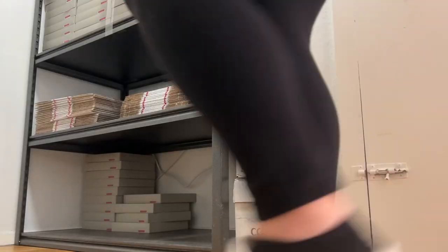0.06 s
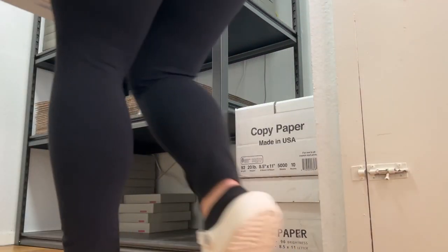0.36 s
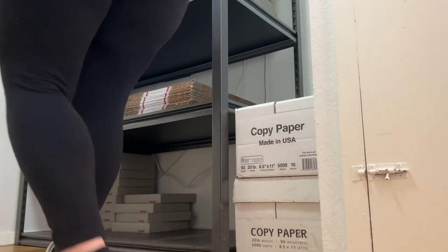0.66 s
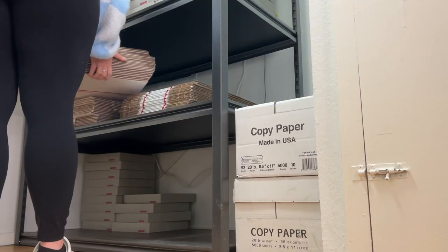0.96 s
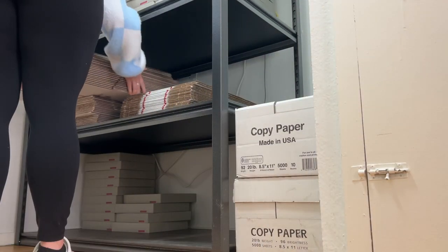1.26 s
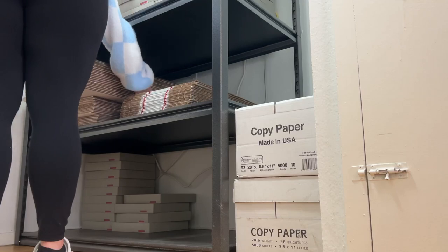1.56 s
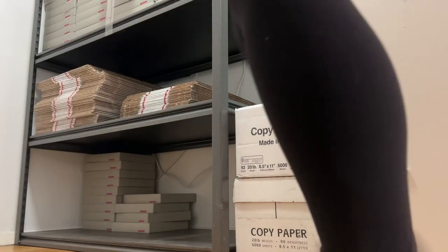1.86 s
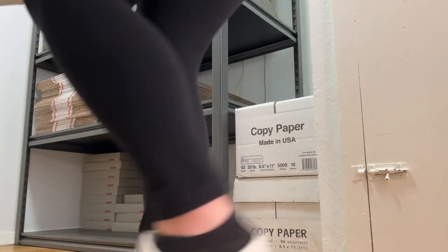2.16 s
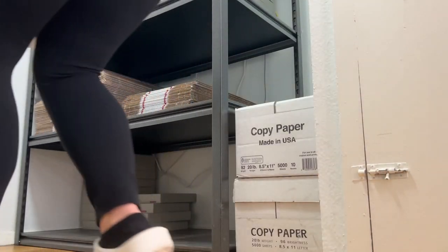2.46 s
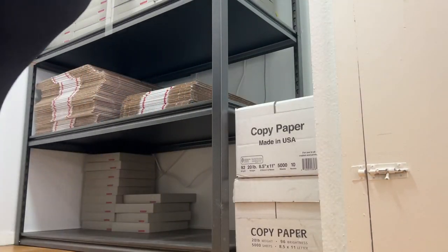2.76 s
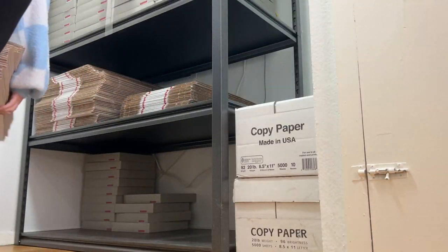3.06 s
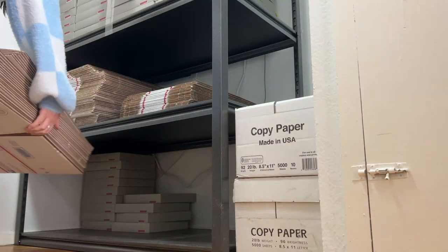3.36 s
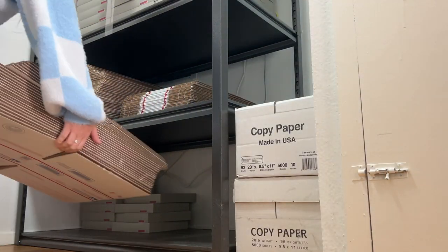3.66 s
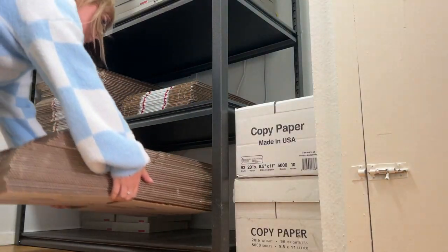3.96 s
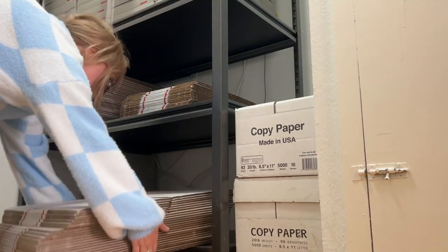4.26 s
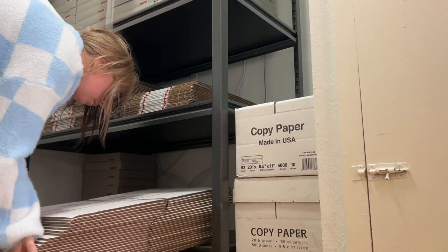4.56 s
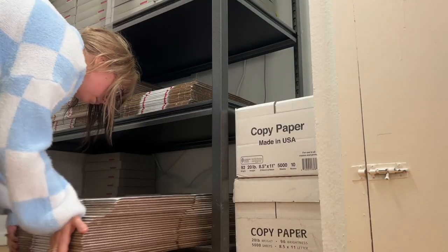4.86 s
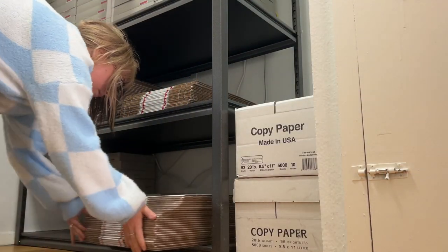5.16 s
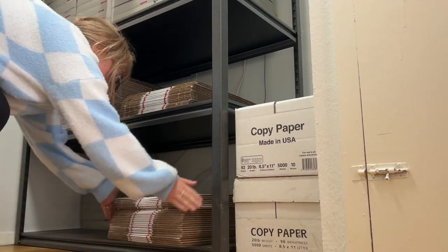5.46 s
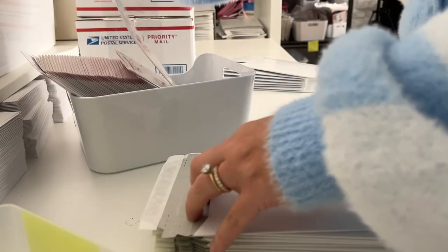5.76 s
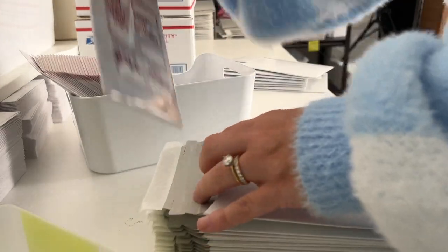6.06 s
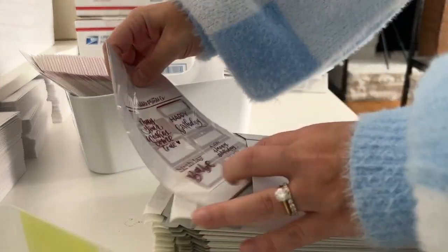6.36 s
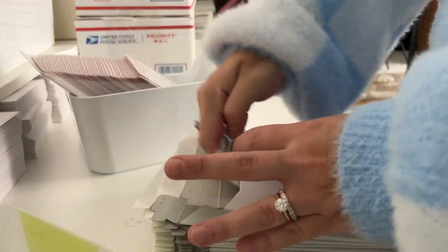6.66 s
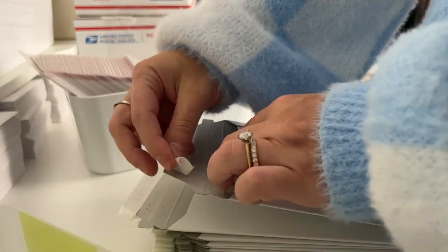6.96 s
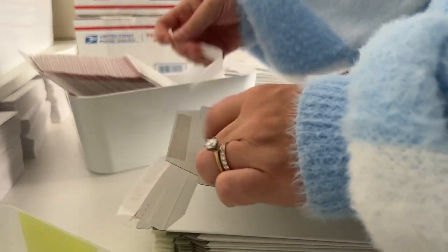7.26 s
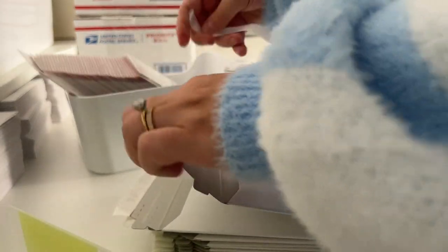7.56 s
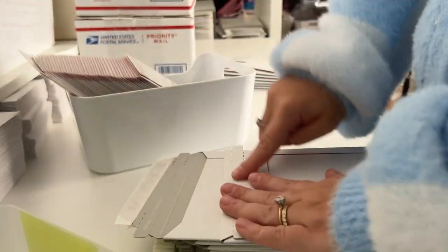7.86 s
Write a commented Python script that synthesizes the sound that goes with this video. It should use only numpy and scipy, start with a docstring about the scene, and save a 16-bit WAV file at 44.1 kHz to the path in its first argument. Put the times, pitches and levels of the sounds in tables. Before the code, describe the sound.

Flat cardboard boxes knock down and scrape along a metal shelf, followed by crisp paper crackling and finger taps on a card mailer.

```python
"""Bundles of flat cardboard boxes are shelved in a small storeroom: card scuffs, clothes swish, soft shoes
step on boards. One bundle knocks down on the steel shelf, slides in with a judder and thuds at the back.
Then, close up at a desk, a paper slip is tucked into a card mailer, its strip peeled off and the flap
pressed down: fibres rub, creases snap, fingers ring the hollow card. A low rumble fills both rooms."""
import sys
import numpy as np
from scipy import signal
from scipy.fft import rfft, irfft
from scipy.io import wavfile
from scipy.ndimage import uniform_filter1d

SR = 44100
rng = np.random.default_rng(int(sys.argv[2]) if len(sys.argv) > 2 else 0)


def log_audio(samples):
    """Write samples as a 16-bit WAV file to the path given in sys.argv[1]."""
    # one column per channel
    frames = np.atleast_2d(samples).T
    # limit to full scale, then quantise
    limited = np.clip(frames, -1, 1)
    pcm = np.round(limited * 32767).astype(np.int16)
    wavfile.write(sys.argv[1], SR, pcm)


N = 349272
TIME_S = np.arange(N) / SR
COARSE_TIME_S = np.arange(0, N, 32)[:, None] / SR
DESK_START_S = 5.55
FLAT = ((1, 0), (2, 0))  # 0 dB at all frequencies

# Table levels are relative: each source adds its own gain.
# Noise spectra. Each row: frequency in Hz, density in dB.
STORE_RUMBLE = [(20, -47), (45, -65), (65, -4), (88, 0.5), (115, -2.5), (160, -15.5), (270, -16),
                (450, -32.5), (1000, -70)]
DESK_RUMBLE = [(20, -23), (45, -2), (65, -1), (105, -6.5), (165, 3), (185, -14), (215, -21), (420, -21),
               (1000, -103)]
STORE_AIR = [(20, -35), (50, 21), (110, -22), (300, 0.5), (520, 4.5), (660, 4), (800, -8.5), (1300, -2.5),
             (3000, -11), (7000, -10.5), (11000, -68), (16000, -49)]
DESK_AIR = [(100, 9), (400, -3), (1000, 3), (1700, -13), (5000, -8), (10000, -23), (16000, -16)]
CLOTH_SWISH = [(500, -59), (1500, -1), (3000, 0), (5800, 4.5), (8500, 3.5), (10000, -2.5), (12000, 3),
               (16000, -5.5)]
CARD_SCUFF = [(130, 4.5), (260, 0.5), (450, 1.5), (750, -2), (1000, 1), (1600, -4), (2600, -5.5),
              (5000, -13.5), (12000, -24)]
EDGE_KNOCK = [(180, -16), (420, 3), (700, -6), (1200, 1.5), (1700, -9), (9000, -17), (16000, -27)]
CARD_CRACK = [(300, -42), (1200, 12), (3000, 6), (6000, 3.5), (9000, 1), (16000, -12)]
CARD_SLIDE = [(120, -13), (300, 1), (600, 0), (1100, 1), (1400, 2.5), (2100, 0.5), (4300, -0.5), (6700, 0),
              (8700, 0.5), (10000, -4), (12000, -2), (16000, -11)]
PAPER_HISS = [(700, -22), (2000, 5.5), (4000, 0.5), (6500, 1.5), (8300, 4.5), (10000, 0.5), (12500, 5),
              (16000, -2.5)]
PAPER_RUB = [(120, 3), (250, 3), (650, 3), (1250, -1), (2200, -1), (3300, -9.5), (4800, -2.5),
             (12000, -33.5)]
CREASE_SNAP = [(600, -2), (2500, -12), (5000, -4), (8000, 5.5), (10000, 6), (12500, 8), (16000, -0.5)]

# Modes of struck bodies. Each row: frequency in Hz, level in dB, T60 in seconds.
FLOOR_MODES = [(188, -1, 0.055), (277, -7, 0.035), (461, 3, 0.063), (555, -2.5, 0.079), (714, 2, 0.028),
               (1160, -9, 0.051)]
EDGE_MODES = [(450, 6.5, 0.04), (592, -11, 0.15), (932, -11, 0.13), (1133, -15, 0.24), (1215, 3, 0.03),
              (1300, -13, 0.2), (1475, -8, 0.07)]
BUNDLE_MODES = [(389, 3.5, 0.061), (505, -7.5, 0.18), (590, -5.5, 0.063), (679, 3, 0.054), (997, -3, 0.13),
                (1340, -14, .06)]
SHELF_MODES = [(84.8, 5.5, 0.14), (104.5, -1.5, 0.13), (139.8, -4.5, 0.22), (155, -1.5, 0.13),
               (182, -10.5, 0.16), (291, -14, 0.044)]
MAILER_MODES = [(247, 5.5, 0.056), (425, 11, 0.028), (682, -3.5, 0.028), (800, 6.5, 0.033),
                (948, 4.5, 0.043), (1027, 10, 0.029), (1400, 6, 0.016), (1830, 4, 0.041), (2380, 4, 0.03),
                (2890, 15.5, 0.014)]
DESK_MODES = [(89.5, 3.5, 0.11), (121, 0, 0.05), (170, 6.5, 0.053), (242, 2, 0.072)]
# Narrow resonances of the shelf's steel. Each row: centre in Hz, width in Hz, level in dB.
STEEL_PEAKS = [(1430, 90, -5), (2375, 20, -7), (5510, 20, -5), (6728, 35, -2), (6902, 20, -6),
               (8055, 40, -3), (8583, 18, -6), (8695, 25, -4), (8788, 30, -3), (12080, 35, -3)]

# Level of the low room rumble over time. Each row: time in seconds, level in dB.
LOW_RUMBLE_LEVELS = [(0.0, -47.5), (3.24, -57), (5.29, -55.5), (5.62, -51.5), (7.92, -48.5)]
# A leg, sleeve or carried card brushing past. Each row: peak time and length in seconds,
# swish and scuff in dB.
BRUSHES = [(0.04, 0.21, -62, -53), (0.27, 0.34, -62, -54), (0.347, 0.05, -55, -52), (0.555, 0.13, -59, -60),
           (0.706, 0.29, -67.5, -54), (1.034, 0.47, -57.5, -56.5), (1.28, 0.064, -56, -53),
           (1.359, 0.28, -51, -51.5), (1.672, 0.53, -56, -55), (1.976, 0.06, -55.5, -53.5),
           (2.155, 0.21, -52.5, -54), (2.366, 0.051, -68, -57), (2.467, 0.05, -58.5, -57.5),
           (2.571, 0.1, -51.5, -57), (2.667, 0.11, -51.5, -55), (2.758, 0.098, -59.5, -50.5),
           (2.895, 0.12, -55.5, -60), (3.426, 0.16, -56.5, -59), (3.682, 0.079, -60, -57),
           (3.878, 0.11, -54, -67), (4.028, 0.8, -68.5, -56), (4.295, 0.54, -59.5, -63)]
# Soft shoes landing. Each row: start in seconds, board tap, thud and sole slap in dB.
STEPS = [(0.554, -42, -47, -47), (1.938, -35, -47, -40.5), (2.32, -38, -49, -61), (2.627, -41, -48.5, -54),
         (3.824, -50, -45.5, -46), (3.85, -53, -50, -34.5)]
# Soles turning. Each row: peak time in seconds, level in dB, centre in Hz.
SOLE_SCRAPES = [(0.309, -55.5, 1620), (2.039, -50, 1170), (2.359, -57, 1400), (3.821, -52, 2820),
                (4.07, -54.5, 2090)]
# A bundle hitting a hard edge. Each row: start in seconds, knock and ring in dB, ring centre in Hz.
EDGE_HITS = [(3.0755, -39.5, -38, 420), (3.0845, -44.5, -39, 1250)]
# A bundle striking the shelf and rocking back. Each row: start in seconds, knock in dB, its centre in Hz,
# thud in dB, its spectral dip in Hz, stack note, clack and crack in dB, settling delay in seconds.
SHELF_HITS = [(4.152, -22, 296, -27.5, 190, -24, -36, -28.5, 0.0023),
              (4.179, -33.5, 330, -39, 190, -31, -52, -41, 0.0015),
              (4.286, -21, 633, -33.5, 200, -26.5, -43, -34.5, 0.0067),
              (5.323, -26, 230, -13, 103, -33, -42.5, -55, 0.0017),
              (5.371, -35, 260, -34, 170, -32, -51, -39.5, 0.0012)]
# The push along the shelf. Each row: time in seconds, hiss and judder in dB, judder in Hz, rumble in dB.
SHELF_PUSH = [(4.59, -59.5, -77, 200, -68), (4.651, -44, -66, 203.4, -62), (4.82, -34, -60, 204, -45),
              (4.97, -34.5, -54, 202.2, -38.5), (5.07, -34, -40.5, 227.3, -43.5),
              (5.17, -35.5, -47.5, 200, -46), (5.25, -37.5, -55, 200, -55),
              (5.371, -40.5, -40.5, 198.4, -30), (5.53, -74, -75, 205, -75)]
# Slip sliding, strip peeling, flap being smoothed. Each row: peak time, build-up and release in seconds,
# hiss and rub in dB.
PAPER_PULLS = [(5.62, 0.55, 0.14, -64, -63), (5.845, 0.29, 0.15, -60, -63),
               (6.137, 0.013, 0.078, -39.5, -33.5), (6.385, 0.22, 0.097, -50.5, -43),
               (6.56, 0.015, 0.24, -66, -53.5), (6.701, 0.23, 0.056, -46, -42),
               (6.892, 0.095, 0.068, -47.5, -42.5), (7.05, 0.008, 0.28, -51.5, -41.5),
               (7.249, 0.17, 0.025, -45, -43.5), (7.327, 0.17, 0.06, -47.5, -79),
               (7.522, 0.022, 0.06, -43.5, -42), (7.6, 0.25, 0.24, -51.5, -59),
               (7.745, 0.029, 0.29, -55.5, -53)]
# Creases buckling. Each row: start in seconds, snap and flap in dB, flap centre in Hz.
CREASES = [(5.552, -44, -53, 3000), (5.6122, -32.5, -49, 3280), (5.664, -27.5, -57, 2560),
           (5.83, -29, -50, 4640), (5.8558, -26.5, -52, 4360), (5.908, -37, -54, 1580),
           (6.1244, -23, -35.5, 2840), (6.1425, -32, -36.5, 3200), (6.2912, -20.5, -43, 1860),
           (6.331, -19.5, -35, 3400), (6.343, -26, -36, 2220), (6.3566, -33, -33, 2330),
           (6.377, -30, -29, 1490), (6.3962, -17, -46, 1200), (6.408, -20, -35.5, 4590),
           (6.422, -20.5, -38, 2600), (6.4527, -28.5, -47.5, 1210), (6.5215, -31.5, -47, 1920),
           (6.5496, -20, -33.5, 1530), (6.5574, -21, -49, 4600), (6.5762, -25, -38.5, 1870),
           (6.5947, -20, -34, 2750), (6.6096, -25.5, -49, 3000), (6.63, -25, -42, 1200),
           (6.652, -21, -39, 1250), (6.66, -19.5, -34, 1360), (6.696, -28, -35, 3500),
           (6.921, -24.5, -51, 2290), (6.955, -41, -53, 1400), (6.9993, -46, -42.5, 1790),
           (7.0555, -16, -39, 1750), (7.198, -26, -44, 1390), (7.248, -30, -36.5, 4950),
           (7.2558, -15, -35.5, 5030), (7.5186, -43, -31.5, 4240), (7.596, -41, -31.5, 3480),
           (7.7238, -29.5, -44, 2660)]
# Fingers on the pile of mailers. Each row: start in seconds, tap in dB, its centre in Hz, push in dB.
FINGER_TAPS = [(6.1251, -21.5, 650, -42), (6.148, -28.5, 1410, -38), (6.377, -30, 554, -34),
               (6.666, -35.5, 970, -50), (6.697, -35, 1110, -60), (6.888, -37, 1280, -44.5),
               (6.907, -35, 790, -40), (6.999, -35, 453, -50), (7.05, -35, 450, -62),
               (7.441, -38, 1710, -47.5), (7.473, -38.5, 253, -41.5), (7.518, -35.5, 1100, -46),
               (7.536, -41, 1300, -39.5), (7.581, -29.5, 1290, -50), (7.597, -30, 1590, -56),
               (7.737, -40.5, 1000, -52), (7.805, -36.5, 304, -64), (7.876, -41.5, 1120, -46)]
# A fingertip dragged on the mailer. Each row: start and length in seconds, level in dB, centre in Hz.
FINGER_DRAGS = [(6.655, 0.075, -40, 1050), (6.848, 0.095, -37.5, 1150)]

# Room decay. Each row: frequency in Hz, T60 in seconds.
STORE_T60 = [(80, 0.46), (200, 0.3), (530, 0.28), (1400, 0.39), (4000, 0.48), (14000, 0.18)]
DESK_T60 = [(100, 0.58), (500, 0.042), (2000, 0.4), (6000, 0.25), (14000, 0.088)]
# Likeness of the channels. Each row: frequency in Hz, correlation from 0 to 1.
STEREO_CORRELATION = [(60, 0.97), (130, 1), (290, 0.58), (640, 0.049), (1400, 0.17), (3000, 0.2),
                      (7000, 0.029)]
# Microphone imbalance. Each row: frequency in Hz, left minus right in dB.
LEFT_LIFT = [(100, 1), (400, 0), (1000, 1.5), (2800, 2), (4400, 6), (6800, 8), (8200, -1.5), (9000, 0)]


def amp(db):
    """Decibels to gain."""
    return np.exp(np.asarray(db) * (np.log(10) / 20))


def unit_rms(x):
    """Scale to an rms of one."""
    return x / np.sqrt(np.mean(x ** 2) + 1e-20)


def unit_peak(x, size=220):
    """Scale the loudest window of size samples to an rms of one."""
    return x / np.sqrt(uniform_filter1d(np.mean(np.atleast_2d(x) ** 2, 0), size).max() + 1e-20)


def log_interp(points, hz):
    """Interpolate (Hz, value) points in log frequency."""
    point_hz, value = np.transpose(points)
    return np.interp(np.log(hz + 1), np.log(point_hz + 1), value)


def gain_curve(times_s, db):
    """Gain through timed levels, fading 400 dB/s beyond the ends."""
    outside_s = np.maximum(times_s[0] - TIME_S, 0) + np.maximum(TIME_S - times_s[-1], 0)
    return amp(np.interp(TIME_S, times_s, db) - 400 * outside_s)


def stroke_gain(shapes, db):
    """Gain of overlapping strokes, summed in power."""
    return np.interp(TIME_S, COARSE_TIME_S[:, 0], np.sqrt(shapes ** 2 @ amp(db) ** 2))


def add(mix, start_s, sound):
    """Mix a sound in at start_s."""
    part = mix[:, max(round(start_s * SR), 0):][:, :sound.shape[-1]]
    part += sound[..., :part.shape[1]]


def colour(x, spectrum):
    """Give two independent signals a spectrum and stereo correlation."""
    hz = np.fft.rfftfreq(x.shape[1], 1 / SR)
    left, other = rfft(x)
    correlation = np.clip(log_interp(STEREO_CORRELATION, hz), 0, 1)
    pair = np.array([left, correlation * left + np.sqrt(1 - correlation ** 2) * other])
    return unit_rms(irfft(pair * amp(log_interp(spectrum, hz)), x.shape[1]))


def noise(spectrum, size=N):
    """Shaped stereo noise, rms one."""
    return colour(rng.standard_normal((2, size)), spectrum)


def wander(rate_hz, size=N):
    """Random drift below rate_hz, rms one."""
    hz = np.fft.rfftfreq(size, 1 / SR)
    return unit_rms(irfft(rfft(rng.standard_normal(size)) / (1 + (hz / rate_hz) ** 4), size))


def friction(spectrum, catches_per_s, spread_db, grain_share, drift_db):
    """Fibres catch and let go: grains over a hiss whose colour drifts as the contact moves."""
    strength = amp(spread_db * np.minimum(rng.exponential(1, N), 4.5))
    catches = strength * (rng.random(N) < catches_per_s / SR)
    power = signal.lfilter([1], [1, -np.exp(-1 / 16)], catches ** 2)
    grip = np.sqrt(1 - grain_share + grain_share * power / power.mean())
    frames = signal.stft(grip * rng.standard_normal((2, N)), nperseg=512)[2]
    patches = uniform_filter1d(rng.standard_normal(frames.shape[1:]), size=4, axis=0)
    patches = unit_rms(uniform_filter1d(patches, size=9, axis=1))
    return colour(signal.istft(frames * amp(drift_db * patches), nperseg=512)[1][:, :N], spectrum)


def band(centre_hz, db_per_oct):
    """Spectral hump; a negative slope gives a dip."""
    return [(centre_hz * 2. ** k, -db_per_oct * (np.hypot(k, .5) - .5)) for k in np.arange(-4, 6)]


def burst(spectrum, rise_s, t60_s, ripple_db=0, size=8192):
    """Decaying noise; ripple adds chance resonances."""
    t, hz = np.arange(size) / SR, np.fft.rfftfreq(size, 1 / SR)
    knots_hz = np.geomspace(200, 18000, num=40)
    ripple = amp(ripple_db * np.interp(hz, knots_hz, rng.uniform(-4.4, 1, len(knots_hz))))
    envelope = (1 - np.exp(-t / rise_s)) * amp(-60 * t / t60_s)
    return irfft(rfft(noise(spectrum, size)) * ripple, size) * envelope


def ring(modes, rise_s, weights=FLAT, size=12000):
    """Decaying modes, weighted by the place and softness of the blow."""
    t = np.arange(size) / SR
    tones = [(-1) ** k * amp(db + log_interp(weights, hz) - 60 * t / t60_s) * np.sin(2 * np.pi * hz * t)
             for k, (hz, db, t60_s) in enumerate(modes)]
    return sum(tones) * (1 - np.exp(-(t / rise_s) ** 2))


def room(x, t60_curve, build_s):
    """Scattered reflections, each band decaying at its own rate."""
    hz, t, frames = signal.stft(noise(FLAT, size=20480), SR, nperseg=256)
    decay = amp(-60 * t / log_interp(t60_curve, hz)[:, None])
    tail = signal.istft(frames * decay, SR, nperseg=256)[1]
    tail *= 1 - np.exp(-(np.arange(tail.shape[1]) / SR / build_s) ** 2)
    return signal.oaconvolve(x, tail / np.linalg.norm(tail[0]), axes=1)[:, :N]


def tone(hz):
    """Sine following a frequency curve."""
    return np.sin(2 * np.pi * np.cumsum(hz) / SR)


def room_tone(hum_hz=338, hum_db=-68):
    """Low rumble and air in each place; a fan's wavering hum in the storeroom."""
    rumble = gain_curve(*np.transpose(LOW_RUMBLE_LEVELS))
    at_desk = np.clip((TIME_S - DESK_START_S) * 20 + .5, 0, 1)
    hum = amp(hum_db) * unit_rms(tone(hum_hz + 2.08 * wander(11.5)))
    store = amp(2) * rumble * noise(STORE_RUMBLE) + amp(-62) * noise(STORE_AIR) + hum
    desk = amp(-2) * rumble * noise(DESK_RUMBLE) + amp(-70) * noise(DESK_AIR)
    return store * np.sqrt(1 - at_desk) + desk * np.sqrt(at_desk)


def clothes_and_card(idle_swish_db=-84.5, idle_scuff_db=-62.6):
    """Friction follows each move's speed: cloth swishes finely, card scuffs lower and coarser."""
    peak_s, length_s, swish_db, scuff_db = np.transpose(BRUSHES)
    speed = np.exp(-(2 * (COARSE_TIME_S - peak_s) / length_s) ** 2)
    in_store = TIME_S < DESK_START_S
    swish = np.hypot(stroke_gain(speed, swish_db + 4.5), in_store * amp(idle_swish_db))
    scuff = np.hypot(stroke_gain(speed, scuff_db + 0.9), in_store * amp(idle_scuff_db))
    cloth = friction(CLOTH_SWISH, catches_per_s=2700, spread_db=4.5, grain_share=0.12, drift_db=2.5)
    card = friction(CARD_SCUFF, catches_per_s=300, spread_db=2, grain_share=0.29, drift_db=1.8)
    return swish * cloth + scuff * card


def footsteps():
    """A sole slaps, the boards ring hollow, the weight thuds after; a turning sole rasps."""
    out = np.zeros((2, N))
    for start_s, tap_db, thud_db, slap_db in STEPS:
        slap = unit_peak(burst(band(1200, db_per_oct=4.5), rise_s=0.00045, t60_s=0.049))
        thud = unit_peak(burst(band(170, db_per_oct=11), rise_s=0.012, t60_s=0.095))
        add(out, start_s, amp(slap_db - 4.5) * slap + amp(thud_db + 2.5) * thud)
        add(out, start_s, amp(tap_db - 6) * unit_peak(ring(FLOOR_MODES, rise_s=0.0014)))
    for peak_s, db, hz in SOLE_SCRAPES:
        add(out, peak_s - .07, amp(db) * noise(band(hz, db_per_oct=12), size=6144) * np.hanning(6144))
    return out + amp(-2) * room(out, STORE_T60, build_s=0.0024)


def card_squeak(start_s=0.727, start_hz=3300, glide_hz_per_s=9000):
    """Card rubs on card in one short rising squeak."""
    out, t = np.zeros((2, N)), np.arange(0, .06, 1 / SR)
    squeak = tone(start_hz + glide_hz_per_s * t + 170 * wander(400, size=len(t)))
    add(out, start_s, amp(-55.5) * squeak * np.hanning(len(t)))
    return out


def edge_knocks():
    """A lifted bundle knocks twice on a hard edge, which rings."""
    out = np.zeros((2, N))
    for start_s, knock_db, ring_db, hz in EDGE_HITS:
        knock = burst(EDGE_KNOCK, rise_s=0.0003, t60_s=0.19)
        edge = ring(EDGE_MODES, rise_s=0.00042, weights=band(hz, db_per_oct=10))
        add(out, start_s, amp(knock_db) * unit_peak(knock))
        add(out, start_s, amp(ring_db) * unit_peak(edge))
    return out


def shelf_impacts(stack_hz=207, stack_t60_s=0.086):
    """Edges crack, sheets clack, the hollow bundle knocks; its settling weight thuds in the shelf."""
    knocks, thuds = np.zeros((2, 2, N))
    stack = ring([(stack_hz, 0, stack_t60_s)], rise_s=0.0038)
    for start_s, knock_db, knock_hz, thud_db, dip_hz, stack_db, clack_db, crack_db, settle_s in SHELF_HITS:
        crack = burst(CARD_CRACK, rise_s=0.00033, t60_s=0.059)
        clack = burst(band(930, db_per_oct=13), rise_s=0.00027, t60_s=0.28)
        body = ring(BUNDLE_MODES, rise_s=0.00049, weights=band(knock_hz, db_per_oct=21))
        knock = burst(band(knock_hz, db_per_oct=23.5), rise_s=0.00069, t60_s=0.076)
        shelf = ring(SHELF_MODES, rise_s=0.0037, weights=band(dip_hz, db_per_oct=-11))
        add(knocks, start_s, amp(crack_db) * unit_peak(crack) + amp(clack_db + 0.5) * unit_peak(clack))
        add(knocks, start_s, amp(knock_db - 7.5) * unit_peak(body))
        add(knocks, start_s, amp(knock_db - 7.5) * unit_peak(knock))
        add(thuds, start_s + settle_s, amp(thud_db + 1.5) * unit_peak(shelf))
        add(thuds, start_s + settle_s, amp(stack_db) * unit_peak(stack))
    return knocks + thuds + room(amp(-6) * knocks + amp(-12) * thuds, STORE_T60, build_s=0.01)


def sliding_bundle():
    """Card groans while slow, then hisses and judders along the shelf; the steel sings and rumbles."""
    times_s, hiss_db, judder_db, judder_hz, rumble_db = np.transpose(SHELF_PUSH)
    scrape = friction(CARD_SLIDE, catches_per_s=7000, spread_db=3, grain_share=0.2, drift_db=1.3)
    hz = np.fft.rfftfreq(N, 1 / SR)
    steel_power = sum(amp(db) ** 2 / width_hz / (1 + (2 * (hz - centre_hz) / width_hz) ** 2)
                      for centre_hz, width_hz, db in STEEL_PEAKS)
    singing = unit_rms(irfft(rfft(noise(FLAT)) * np.sqrt(steel_power), N))
    hiss = gain_curve(times_s, hiss_db + 3.5) * unit_rms(scrape + amp(-6.5) * singing)
    shudder = tone(np.interp(TIME_S, times_s, judder_hz) + 5 * wander(20)) * amp(2.2 * wander(11))
    judder = gain_curve(times_s, judder_db + 4.5) * unit_rms(shudder)
    groan_gain = amp(-41.5) * np.exp(-((TIME_S - 4.72) / 0.13) ** 2)
    groan = groan_gain * noise(band(540, db_per_oct=17)) * unit_rms(amp(3 * wander(90)))
    rumble = gain_curve(times_s, rumble_db) * noise(band(115, db_per_oct=22.5))
    return hiss + judder + rumble + groan


def paper_rustle(swing_db=23.5):
    """Each pull builds and lets go: paper crackles and rubs, sounding the hollow mailer."""
    peak_s, build_s, release_s, hiss_db, rub_db = np.transpose(PAPER_PULLS)
    t = COARSE_TIME_S - peak_s
    effort = amp(-swing_db * np.minimum(np.maximum(-t / build_s, t / release_s), 10))
    crackle = friction(PAPER_HISS, catches_per_s=1400, spread_db=4.5, grain_share=0.3, drift_db=2.5)
    rasp = friction(PAPER_RUB, catches_per_s=1100, spread_db=3, grain_share=0.35, drift_db=1.5)
    return stroke_gain(effort, hiss_db + 5) * crackle + stroke_gain(effort, rub_db + 0.5) * on_mailer(rasp)


def on_mailer(rasp):
    """A rasp plus the mailer resonance it drives, at equal rms."""
    hollow = signal.oaconvolve(rasp, ring(MAILER_MODES, rise_s=0.0002)[None])[:, :rasp.shape[1]]
    return unit_rms(unit_rms(rasp) + unit_rms(hollow))


def crease_snaps():
    """Each buckling crease gives a flap, a sharp snap and a shiver."""
    out = np.zeros((2, N))
    shape = dict(ripple_db=4, size=2048)
    for start_s, snap_db, flap_db, flap_hz in CREASES:
        snap = unit_peak(burst(CREASE_SNAP, rise_s=0.0003, t60_s=0.0042, **shape), size=44)
        shiver = unit_peak(burst(CREASE_SNAP, rise_s=0.0016, t60_s=0.035, **shape))
        flap = unit_peak(burst(band(flap_hz, db_per_oct=14), rise_s=0.00033, t60_s=0.021, **shape))
        add(out, start_s, amp(flap_db - 0.5) * flap)
        add(out, start_s + 0.00076, amp(snap_db - 3) * (snap + amp(-16) * shiver))
    return out


def finger_taps():
    """Fingers ring the mailer, a nail brighter than a pad, and push the desk below."""
    out = np.zeros((2, N))
    for start_s, tap_db, hz, push_db in FINGER_TAPS:
        body = ring(MAILER_MODES, rise_s=0.00027, weights=band(hz, db_per_oct=12))
        scuff = burst(band(hz, db_per_oct=5), rise_s=0.001, t60_s=0.04, ripple_db=4, size=len(body))
        add(out, start_s, amp(tap_db - 5.5) * (unit_peak(body) + amp(-9) * unit_peak(scuff)))
        add(out, start_s, amp(push_db + 2) * unit_peak(ring(DESK_MODES, rise_s=0.0073)))
    return out


def finger_drags():
    """A dragged fingertip makes the mailer rasp."""
    out = np.zeros((2, N))
    for start_s, length_s, db, hz in FINGER_DRAGS:
        size = round(length_s * SR)
        rasp = noise(band(hz, db_per_oct=15), size) * amp(2 * wander(200, size))
        add(out, start_s, amp(db) * on_mailer(rasp) * np.hanning(size))
    return out


def scene():
    """The storeroom, then the desk, each with its reflections."""
    desk = paper_rustle() + crease_snaps() + finger_taps() + finger_drags()
    store = clothes_and_card() + sliding_bundle() + footsteps()
    lifting = card_squeak() + edge_knocks()
    store += lifting + amp(-11) * room(lifting, STORE_T60, build_s=0.002) + shelf_impacts()
    return room_tone() + store + desk + amp(-15) * room(desk, DESK_T60, build_s=0.0022)


def record(dry, low_cut_hz=34, high_cut_hz=16250, right_lead_s=0.000246):
    """Band-limited microphone pair: leans left, shares its top octave, which comes earlier on the right."""
    hz = np.fft.rfftfreq(N, 1 / SR)
    left, right = rfft(dry) * hz ** 2 / np.hypot(hz ** 2, low_cut_hz ** 2)
    shared = np.clip((hz - 7000) / 1600, 0, .97)
    right = np.sqrt(1 - shared) * right + np.sqrt(shared) * left * np.exp(2j * np.pi * hz * right_lead_s)
    lean = amp(log_interp(LEFT_LIFT, hz) / 2)
    out = irfft(np.array([left * lean, right / lean]), N)
    lowpass = signal.firwin(255, high_cut_hz, window=("kaiser", 9), fs=SR)
    return signal.oaconvolve(out, lowpass[None], "same")


dry = scene()
out = record(dry)
log_audio(out)
```